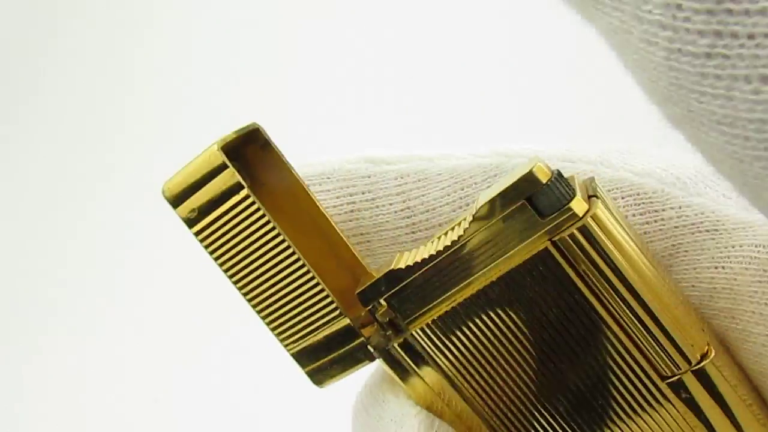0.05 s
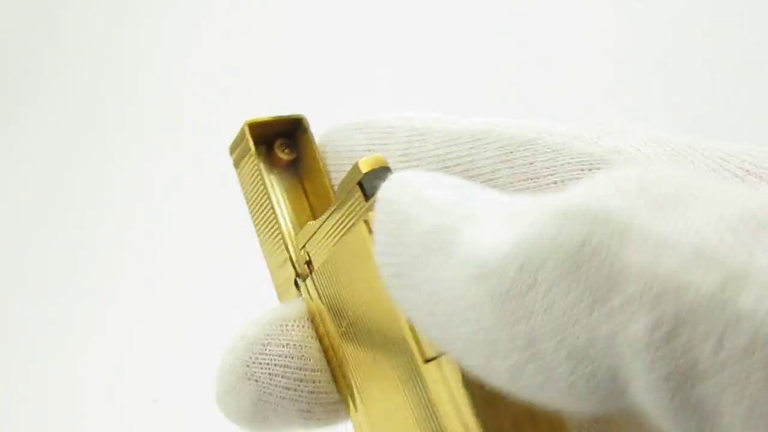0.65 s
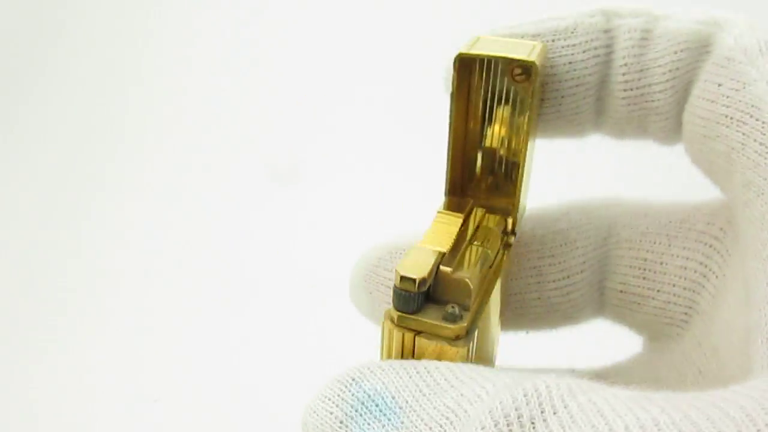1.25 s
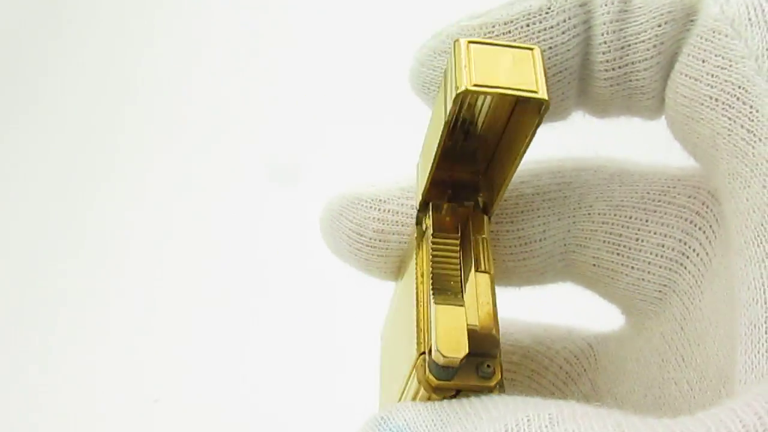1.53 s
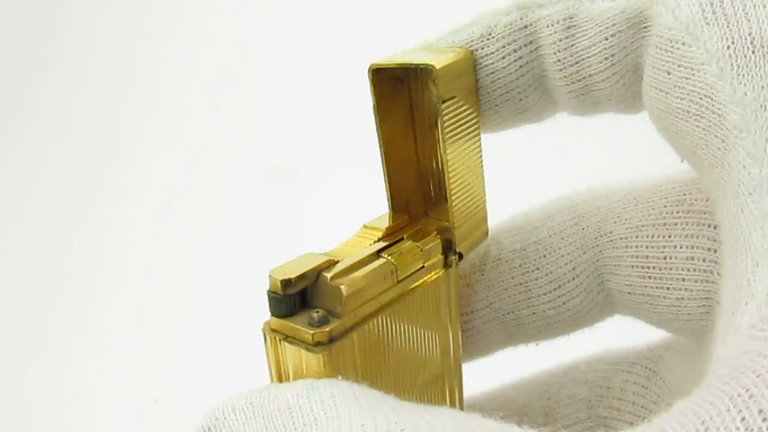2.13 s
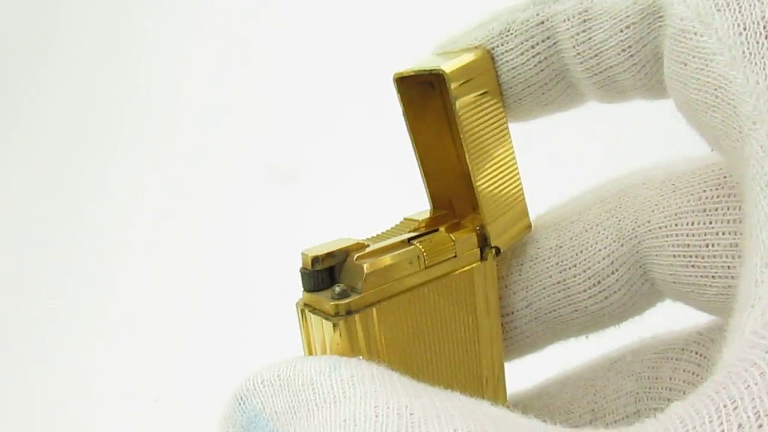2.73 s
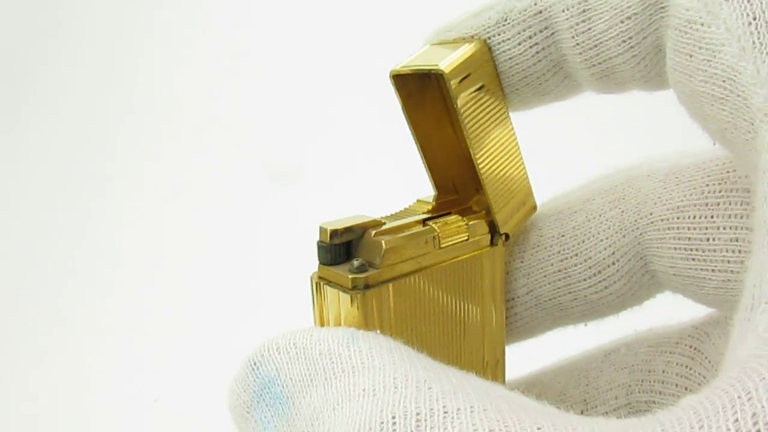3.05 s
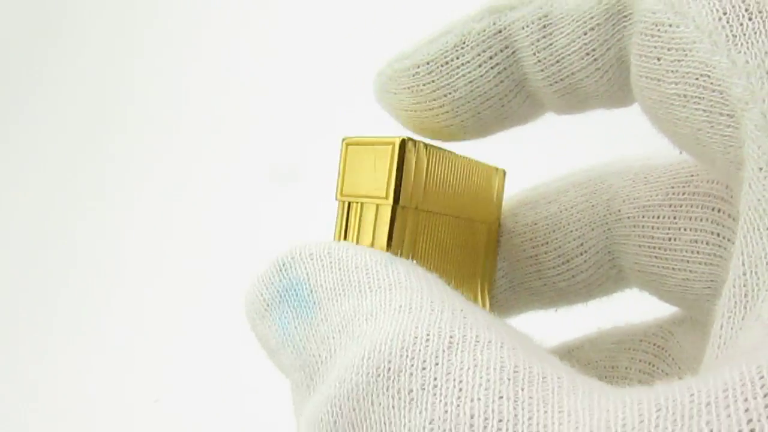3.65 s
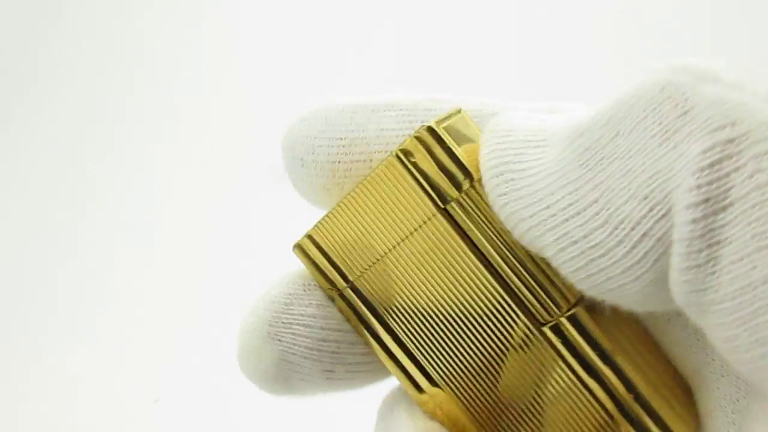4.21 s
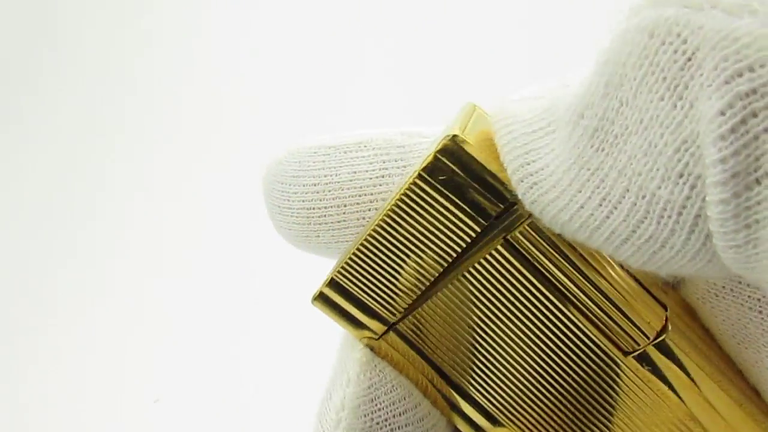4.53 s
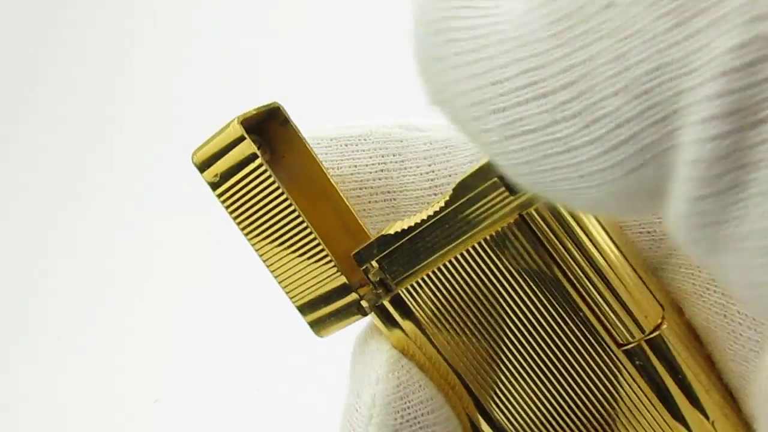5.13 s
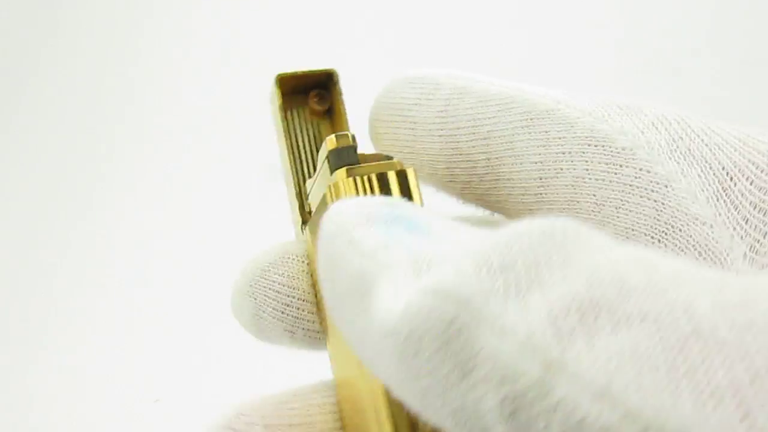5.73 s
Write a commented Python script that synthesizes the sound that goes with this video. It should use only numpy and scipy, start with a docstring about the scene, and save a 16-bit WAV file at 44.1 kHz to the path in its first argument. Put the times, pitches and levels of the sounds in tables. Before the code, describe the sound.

A metal lighter lid pings open, unlit gas hisses faintly, then the lid snaps shut sharply and pings open again.

```python
"""First comes the fading ping of a metal lighter lid, just sprung open in a gloved hand, close to a
stereo microphone in a quiet room. Unlit gas hisses and cotton rubs on the case. The hinge squeaks
faintly and the lid snaps shut; then the thumb scrapes it past its catch and it pings open again.
At this distance the snap overloads the recorder, whose gain control ducks the room and eases it back."""
import sys
import numpy as np
from scipy import signal
from scipy.fft import rfft, irfft
from scipy.io import wavfile
from scipy.ndimage import uniform_filter1d, minimum_filter1d

SR = 44100
rng = np.random.default_rng(int(sys.argv[2]) if len(sys.argv) > 2 else 0)


def store_wav(level_fs):
    """Save 16-bit WAV to argv[1]."""
    pcm = np.round(np.clip(np.atleast_2d(level_fs), -1, 1) * 32767)
    wavfile.write(sys.argv[1], SR, pcm.T.astype(np.int16))


N = 254537
TIME = np.arange(N) / SR

# The lid springs open. Each row: start in seconds, gain in dB, factor on ring time (the glove damps it).
LID_OPENINGS = [(-.044, 0.5, 0.79), (4.8659, -1.5, 0.88)]
# The lid lands on the case. Each row: start in seconds, gain in dB.
LID_CLOSINGS = [(3.6365, -0.5)]
# The catch slips under the thumb. Each row: start in seconds, level in dB.
CATCH_SLIPS = [(4.7324, -48), (4.795, -47), (4.8192, -41), (4.824, -33), (4.8321, -30.5), (4.835, -32.5)]
# Modes of the free lid and the shut case. Each row: pitch in Hz, relative level in dB, t60 in seconds.
LID_MODES = [(3120, -30, 0.069), (3408, -42, 0.089), (3540, -20, 0.047), (4000, -43, 0.35), (4830, 1, 0.24),
             (4838, -19, 0.41), (6700, -33, 0.11), (8960, -15.5, 0.087), (9100, -22, 0.072),
             (10900, -8, 0.079), (14000, -14, 0.064)]
CASE_MODES = [(4800, -22, 0.21), (4823, -13.5, 0.055), (5500, -17, .17), (6170, -25, 0.26),
              (6300, -24, .18), (6600, -15.5, .045), (7540, -23, 0.32), (8715, -8.5, .055),
              (8785, -16.5, 0.15), (9600, -18, 0.087), (10240, -17, .08), (10200, -3.5, .12),
              (12150, 7, 0.056), (11780, -5, 0.089), (12500, -21.5, .19), (14200, -21, .05),
              (15000, -13, .12)]
# Resonances of the gas jet. Each row: centre in Hz, width in Hz, relative level in dB.
JET_RESONANCES = [(4880, 310, -6), (10745, 550, -0.5), (11770, 1400, -4.5), (12600, 690, -6)]
# The jet's aim past the microphone. Each row: time in seconds, level in dB, treble tilt in dB per octave.
JET_TURNS = [(.25, -67.5, 6), (.9, -63, -22), (1.22, -64, -2), (1.47, -69, -7), (1.7, -66.5, -18),
             (2.05, -65, 13), (2.75, -65.5, 10), (3.45, -65.5, -6), (5.2, -64.5, -4)]
# The glove strokes the case. Each row: start in seconds, length in seconds, level in dB.
GLOVE_STROKES = [(0, 0.34, -66.5), (0.403, 0.37, -59.5), (4.216, 0.053, -56), (4.566, 0.058, -73),
                 (5.15, 0.34, -71.5), (5.508, 0.23, -59)]
# Soft thuds of the hand. Each row: start in seconds, level in dB, t60 in seconds.
HAND_THUDS = [(.98, -41.5, .9), (4.05, -41.5, 0.21), (4.405, -38, 0.4), (5.125, -43.5, 0.57),
              (5.445, -44, 0.35)]
# Hum in the room. Each row: pitch in Hz, level in dB.
ROOM_HUM = [(48.8, -54.5), (89, -68.5), (213.5, -66.5), (856, -79)]
# Faint low tones that come and go. Each row: peak time in seconds, pitch in Hz, level in dB,
# half-width in seconds.
ROOM_SWELLS = [(0.984, 388, -51, .03), (3.096, 333, -55.5, 0.036), (3.42, 90.4, -54, .16)]
# How alike the air is left and right. Each row: frequency in Hz, correlation from -1 to 1.
AIR_LIKENESS = [(30, 0.8), (60, .3), (130, -0.4), (260, -0.31), (600, -0.2), (1500, 0.096), (4000, 0),
                (15000, -0.1)]

# Noise spectra at the microphone. Each row: frequency in Hz, relative level in dB.
CRACK_SPECTRUM = [(60, -20), (250, -19), (600, -17.5), (1200, -19), (2200, -21), (3100, -11), (4200, -19.5),
                  (6500, -9.5), (8000, -10.5), (8900, -7), (10100, -11.5), (11100, 5.5), (12500, -8),
                  (13700, -7.5), (15600, -15.5)]  # the lid's edge strikes the case
KNOCK_SPECTRUM = [(60, -7), (300, -9.5), (650, 3.5), (1100, -0.5), (2100, -10), (3100, 4), (4500, -13),
                  (9000, -30)]  # the body of that blow
SHUT_SPECTRUM = [(100, -23), (700, -32), (1600, -10), (2400, -19), (3800, -18), (5000, -8), (6500, -3),
                 (8000, -11), (8800, 0.5), (10000, -7.5), (11000, -1), (13000, -9), (14700, -13.5),
                 (15600, -13)]  # chatter on closing
OPEN_SPECTRUM = [(100, -6), (400, -25.5), (900, -23), (1900, -15.5), (2900, -5.5), (3600, 1.5), (4400, -3),
                 (5500, -11.5), (6400, -7.5), (7800, -15.5), (8900, -1.5), (9900, -12), (10800, -3.5),
                 (12800, -17.5), (13900, -3), (15200, -42)]  # crack and chatter on opening
STOP_SPECTRUM = [(300, -19.5), (1900, -30), (2700, -15.5), (3500, 2), (4200, -7.5), (5500, -40)]  # the lid clinks on its stop
SLIP_SPECTRUM = [(150, -5), (700, -5.5), (2000, -11), (4000, -8), (4800, -6), (5500, -8), (6200, 1),
                 (7700, -15), (8900, 2), (9700, -17), (10600, -0.5), (13000, -10), (15500, -15)]  # the spring scrapes its cam
COTTON_SPECTRUM = [(200, -14), (1500, -10.5), (2400, -3.5), (4200, -2.5), (7500, -2.5), (8700, 0.5),
                   (11000, 1), (13000, -4.5), (15700, -11.5)]  # cotton on metal
SHIFT_SPECTRUM = [(30, -22), (140, 0.5), (380, -4.5), (600, -12), (1000, -12), (1750, -15.5), (2200, -22),
                  (6000, -44), (15000, -49)]  # the fingers change their hold
GRIP_SPECTRUM = [(10, -27), (24, -11), (36, -7), (52, 11), (75, -28), (150, -32), (400, -38), (1200, -62)]  # the grip knocks and flexes
TAP_SPECTRUM = [(200, -2), (1800, 1), (3000, -4.5), (7000, -7), (10000, -7), (15000, -26)]  # a fingertip on the lid
AIR_SPECTRUM = [(10, -19), (25, -11.5), (45, -12.5), (70, -2), (130, -4.5), (250, -9.5), (400, -13.5),
                (600, -20), (1100, -21.5), (2000, -27.5), (3500, -30), (7000, -32), (10000, -30.5),
                (13000, -32.5), (15700, -38)]  # room air


def lid_ping():
    """The lid hits its stop, chatters briefly and rings on like a small bell; the room answers."""
    out = np.zeros((2, N))
    for start, db, freedom in LID_OPENINGS:
        crack = amp(-17.5) * burst(OPEN_SPECTRUM, length=0.001303, spread=1.0)
        clink = amp(-12) * burst(STOP_SPECTRUM, length=0.001312, spread=0.41)
        chatter = amp(-16) * dying(OPEN_SPECTRUM, t60=0.049, rise=0.00048, likeness=0.15)
        modes = [(hz, mode_db, t60 * freedom) for hz, mode_db, t60 in LID_MODES]
        bell = amp(-21) * ring(modes, rise=0.0089, spread=1.0, echo=0.25) * pan(db=-7)
        room = amp(-37.5) * dying(OPEN_SPECTRUM, t60=0.32, rise=0.0054)
        add(out, start, amp(db) * (crack + clink + chatter + bell + room))
    return out


def lid_snap():
    """The lid slams home: a bright crack over a solid knock, chatter, the ringing case, then the room."""
    out = np.zeros((2, N))
    for start, db in LID_CLOSINGS:
        crack = amp(10) * burst(CRACK_SPECTRUM, length=0.001379, spread=1.0) * pan(db=5)
        knock = amp(-11) * burst(KNOCK_SPECTRUM, length=0.001, spread=1.0) * pan(db=-5)
        chatter = amp(-1.5) * dying(SHUT_SPECTRUM, t60=0.052, rise=0.00058, likeness=0.24)
        case = amp(-10) * ring(CASE_MODES, rise=0.002, spread=1.0, echo=0.81)
        room = amp(-23) * dying(SHUT_SPECTRUM, t60=0.4, rise=0.0059)
        add(out, start, amp(db) * (crack + knock + chatter + case + room))
    return out


def catch_scrape():
    """The spring drags over its cam with growing force and slips in small metallic scrapes."""
    first, last = CATCH_SLIPS[0][0], CATCH_SLIPS[-1][0]
    force = amp(np.interp(TIME, [first, last], [-68, -52]))
    contact = envelope(first, last - first, attack=0.002, t60=0.22)
    out = noise(SLIP_SPECTRUM, likeness=0.46) * force * contact
    for start, db in CATCH_SLIPS:
        scrape = dying(SLIP_SPECTRUM, t60=0.019, rise=0.00033, likeness=0.46)
        room = amp(-18) * dying(SLIP_SPECTRUM, t60=0.24, rise=0.008)
        add(out, start, amp(db) * (scrape + room))
    return out


def gas_hiss(away_s=1.63, away_width_s=0.15, pitch_sag=0.034, pivot_hz=12150):
    """Unlit gas hisses through the jet's resonances, sagging in pitch as it points off the microphone."""
    pitch = 1 - pitch_sag * swell(away_s, away_width_s)
    times, levels, tilts = np.transpose(JET_TURNS)
    aim_db, tilt = np.interp(TIME, times, levels), np.interp(TIME, times, tilts)
    turbulence = rng.standard_normal((2, N))
    turbulence = turbulence + 0.25 * turbulence[::-1]
    hiss = 0
    for hz, width, db in JET_RESONANCES:
        # only the treble is beamed enough to change with the turn
        beam_db = tilt * np.log2(hz / pivot_hz) * (hz > pivot_hz / 2)
        hiss += amp(db + beam_db) * resonate(turbulence, hz * pitch, width)
    return unit_rms(hiss) * valve_flow() * amp(aim_db + 0.74 * drift(rate=6)) * pan(db=0.5)


def valve_flow(build_s=0.35, lead_s=0.051, cutoff_s=0.025):
    """Gas flow from 0 to 1: it builds after each opening; the falling lid cuts it just before landing."""
    flow = np.zeros(N)
    for start, _, _ in LID_OPENINGS:
        shut = min([landing - lead_s for landing, _ in LID_CLOSINGS if landing > start], default=np.inf)
        build = 1 - np.exp(-np.maximum(TIME - start, 0) / build_s)
        flow += build * np.clip((shut - TIME) / cutoff_s, 0, 1)
    return flow


def glove_rub():
    """Cotton strokes the metal case with a grainy friction, a little right of centre."""
    strokes = sum(amp(db) * envelope(start, length, attack=0.035, t60=0.51)
                  for start, length, db in GLOVE_STROKES)
    return noise(COTTON_SPECTRUM, likeness=0.14) * strokes * amp(1.7 * drift(rate=150)) * pan(db=-5)


def finger_shift():
    """The fingers shift their hold once; the shuffle dulls as they settle."""
    movement = amp(-47) * envelope(start=0.921, length=0.12, attack=0.069, t60=0.43)
    shuffle = noise(SHIFT_SPECTRUM, likeness=0.62) * movement * amp(0.55 * drift(rate=68))
    dull = signal.sosfilt(signal.butter(2, 500, fs=SR, output="sos"), shuffle)
    settled = np.interp(TIME, [0.985, 1.06], [0, 1])
    return shuffle * (1 - settled) + amp(1.5) * dull * settled


def grip_thuds(attack_s=0.023, flex_start_s=4.7):
    """The hand thuds softly; once the thumb bears on the lid, the grip keeps flexing unevenly."""
    thuds = sum(amp(db) * envelope(start, 2 * attack_s, attack_s, t60) for start, db, t60 in HAND_THUDS)
    flex = amp(-53.5 + 3 * drift(rate=8)) * ramp(flex_start_s, attack_s)
    rumble = noise(GRIP_SPECTRUM, likeness=0.67)
    rumble /= np.sqrt(uniform_filter1d(rumble ** 2, size=4000))  # steady the noise's own level
    return np.hypot(thuds, flex) * rumble


def fingertip_tap(start_s=0.973):
    """A fingertip lands on the open lid."""
    out = np.zeros((2, N))
    add(out, start_s, amp(-46) * dying(TAP_SPECTRUM, t60=0.078, rise=0.002, likeness=0.25))
    return out


def hinge_squeak(from_hz=1180, to_hz=1710):
    """Friction excites two narrow resonances that climb ever faster as the lid starts down."""
    turned = ramp(start=3.17, length=0.398)
    hz = from_hz + (to_hz - from_hz) * turned ** 1.4
    friction = rng.standard_normal(N)
    squeak = resonate(friction, hz, width=57) + amp(-5.5) * resonate(friction, 1.28 * hz, width=120)
    arch = np.sqrt(abs(np.sin(np.pi * turned)))
    return unit_rms(squeak) * amp(-66 + 2 * drift(rate=12)) * arch


def room_tone():
    """The room behind the hand: dull air noise, a wavering hum and a few faint low swells."""
    likeness = curve_at(AIR_LIKENESS, np.fft.rfftfreq(N, 1 / SR))
    air = amp(-53.5) * noise(AIR_SPECTRUM, likeness=likeness) * amp(0.5 * drift(rate=6.4))
    tones, channel_phase = 0, np.array([[0], [1.1]])
    for hz, db in ROOM_HUM:
        tone = np.sin(2 * np.pi * hz * TIME + 2.28 * drift(rate=5) + channel_phase)
        tones += amp(db) * unit_rms(tone * amp(3.6 * drift(rate=4.5)))
    for peak, hz, db, width in ROOM_SWELLS:
        tone = np.sin(2 * np.pi * hz * TIME + 0.39 * drift(rate=20) + channel_phase)
        tones += amp(db) * swell(peak, width) * tone
    return air + tones * pan(db=-1)


def burst(spectrum, length, spread, size=4096):
    """A hard contact: each frequency arrives at its own moment within `length` seconds."""
    hz = np.fft.rfftfreq(size, 1 / SR)
    knots = np.linspace(0, SR / 2, num=40)
    delay = length * np.interp(hz, knots, rng.uniform(0.15, 1, len(knots)))
    side = np.interp(hz, knots, rng.choice([-1, 1], len(knots)))
    channel_phase = spread * side * np.array([[-0.5], [0.5]])
    phase = -2 * np.pi * np.cumsum(delay) * hz[1] + channel_phase
    crack = irfft(amp(curve_at(spectrum, hz)) * np.exp(1j * phase))[:, :size // 2]
    crack = np.pad(crack, ((0, 0), (0, SR // 2 - size // 2)))
    return unit_rms(crack) * np.sqrt(2 * length)


def dying(spectrum, t60, rise, likeness=0):
    """A dense cluster of vibrations that swells and dies away."""
    t = TIME[:SR // 2]
    return noise(spectrum, len(t), likeness) * amp(-60 * t / t60) * (1 - np.exp(-t / rise))


def ring(modes, rise, spread, echo):
    """Decaying partials, each reaching left and right `spread` radians apart."""
    t, out = TIME[:SR // 2], 0
    for hz, db, t60 in modes:
        phase = 2 * np.pi * rng.random() + spread * np.array([[0], [1]]) * rng.choice([-1, 1])
        partial = amp(db - 60 * t / t60) * np.sin(2 * np.pi * hz * t + phase)
        # reflections build up and beat with the partial, differently on each side
        flutter = 1 + echo * drift(rate=39, shape=(2, len(t))) * (1 - np.exp(-t / 0.05))
        out += partial * flutter
    return out * (1 - np.exp(-t / rise))


def resonate(x, hz, width):
    """A steep-sided resonance, about `width` Hz wide, that follows the curve hz."""
    carrier = np.exp(2j * np.pi * np.cumsum(hz) / SR)
    pole = np.exp(-np.pi * 1.5 * width / SR)
    return (carrier * signal.lfilter([(1 - pole) ** 2], [1, -2 * pole, pole * pole], x / carrier)).real


def noise(spectrum, size=N, likeness=0):
    """Two partly alike channels of noise with a given spectrum."""
    left, other = rfft(rng.standard_normal((2, size)))
    right = likeness * left + np.sqrt(1 - likeness ** 2) * other
    gain = amp(curve_at(spectrum, np.fft.rfftfreq(size, 1 / SR)))
    return unit_rms(irfft(np.array([left, right]) * gain, size))


def drift(rate, shape=(N,)):
    """Random wandering of unit size, mostly slower than `rate` Hz."""
    slow = np.exp(-(np.fft.rfftfreq(shape[-1], 1 / SR) / rate) ** 2)
    return unit_rms(irfft(rfft(rng.standard_normal(shape)) * slow, shape[-1]))


def envelope(start, length, attack, t60):
    """Rises from its start, holds until its length is over, then dies away."""
    return ramp(start, attack) * amp(-60 * np.maximum(TIME - start - length, 0) / t60)


def ramp(start, length):
    return np.clip((TIME - start) / length, 0, 1)


def swell(peak, width):
    return np.exp(-0.5 * ((TIME - peak) / width) ** 2)


def amp(db):
    return 10 ** (np.asarray(db) / 20)


def unit_rms(x):
    return x / np.sqrt(np.mean(x ** 2, axis=-1, keepdims=True) + 1e-20)


def curve_at(points, hz):
    knots, values = np.transpose(points)
    return np.interp(np.log(hz + 1), np.log(knots + 1), values)


def pan(db):
    """Gains that put the left channel `db` above the right."""
    return amp([[db / 2], [-db / 2]])


def add(mix, start_s, sound):
    """Mixes a sound in, dropping whatever falls outside the scene."""
    start = round(start_s * SR)
    sound = sound[:, max(-start, 0):]
    part = mix[:, max(start, 0):][:, :sound.shape[1]]
    part += sound[:, :part.shape[1]]


def scene():
    """What reaches the microphone: lighter and hand up close, the room behind."""
    lighter = lid_ping() + lid_snap() + catch_scrape() + gas_hiss()
    hand = glove_rub() + finger_shift() + grip_thuds() + fingertip_tap()
    return lighter + hand + hinge_squeak() + room_tone()


def record(dry, limit_db=-5, hold_s=0.26, recover_db_per_s=17, attack_s=0.0011, ceiling=0.81):
    """The recorder's gain drops fast, holds and creeps back; peaks that slip past it are clipped."""
    power = uniform_filter1d((dry ** 2).mean(0), size=65, origin=32)
    over_db = np.maximum(10 * np.log10(abs(power) + 1e-12) - limit_db, 0)
    half_hold = int(hold_s * SR / 2)
    held_db = -minimum_filter1d(-over_db, 2 * half_hold + 1, origin=half_hold, mode="constant")
    recovery_db = recover_db_per_s * TIME
    duck_db = np.maximum.accumulate(held_db + recovery_db) - recovery_db
    pole = np.exp(-1 / (attack_s * SR))
    ducked = dry * amp(-signal.lfilter([1 - pole], [1, -pole], duck_db))
    # the preamplifier clips before sampling, so its overtones do not fold down
    clipped = np.clip(signal.resample_poly(ducked, 2, 1, axis=1), -ceiling, ceiling)
    low_pass = signal.firwin(255, cutoff=15900, window=("kaiser", 8), fs=2 * SR)
    return signal.oaconvolve(clipped, low_pass[None], "same", axes=1)[:, ::2]


dry = scene()
out = record(dry)
store_wav(out)
```